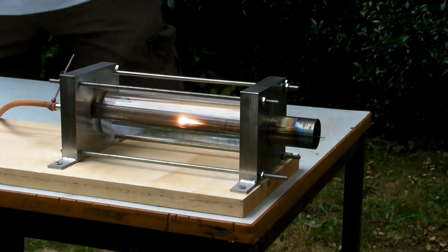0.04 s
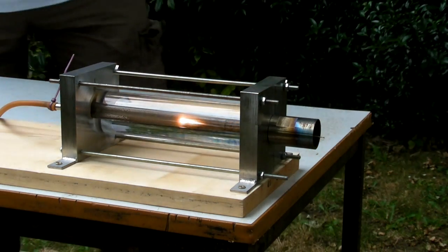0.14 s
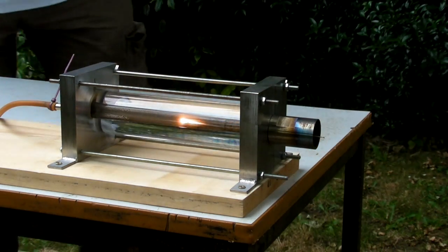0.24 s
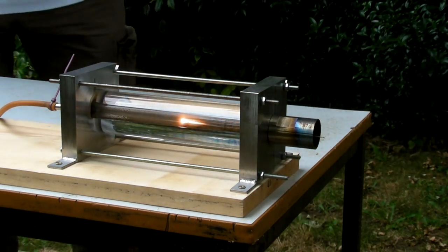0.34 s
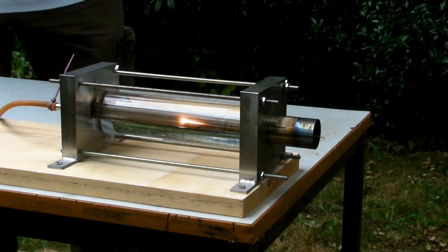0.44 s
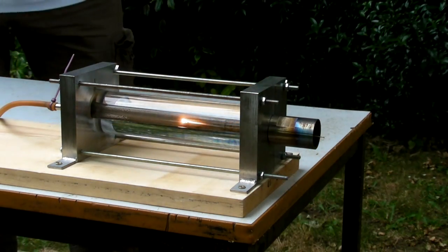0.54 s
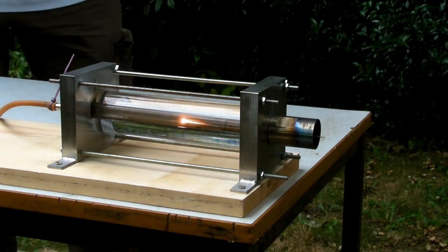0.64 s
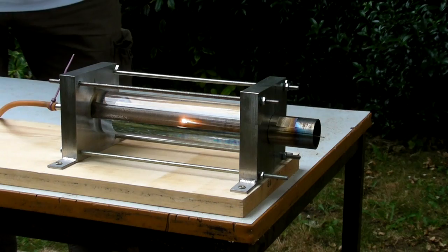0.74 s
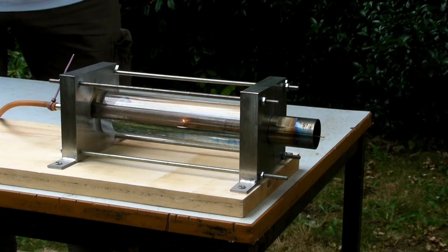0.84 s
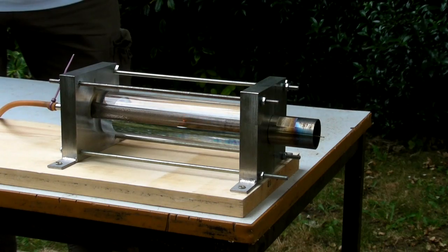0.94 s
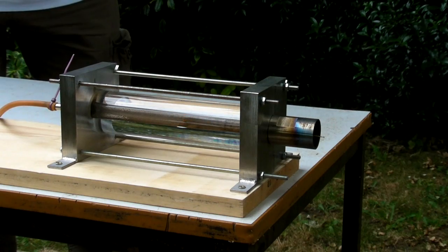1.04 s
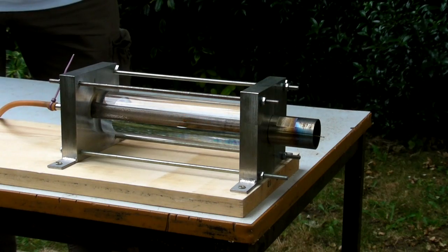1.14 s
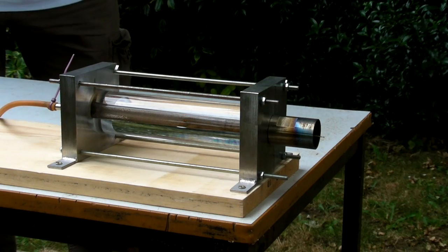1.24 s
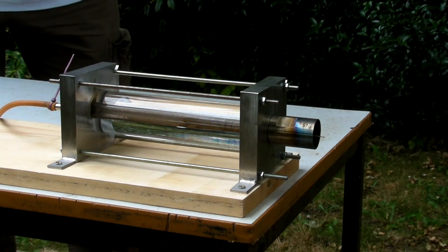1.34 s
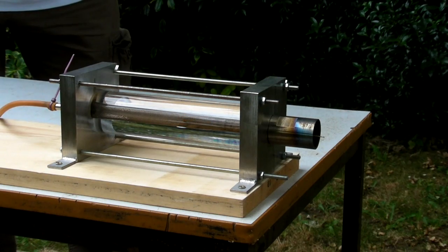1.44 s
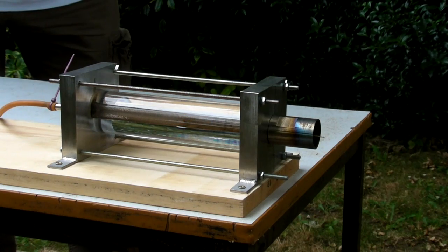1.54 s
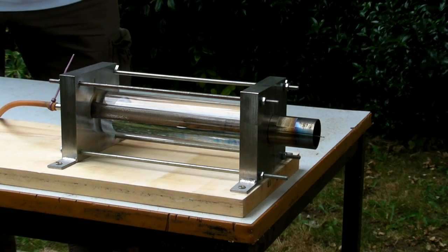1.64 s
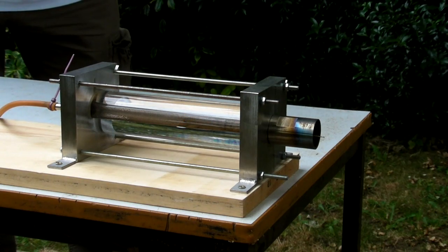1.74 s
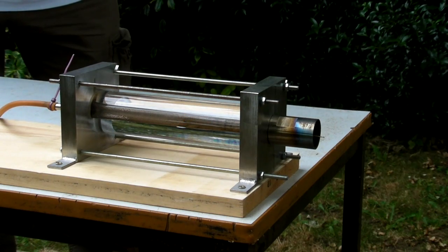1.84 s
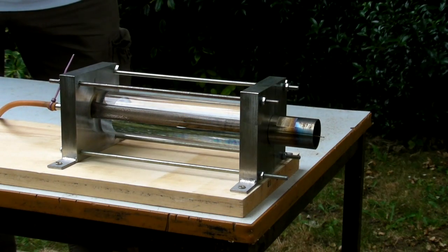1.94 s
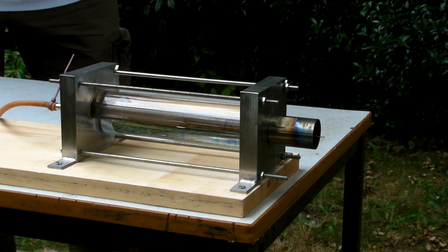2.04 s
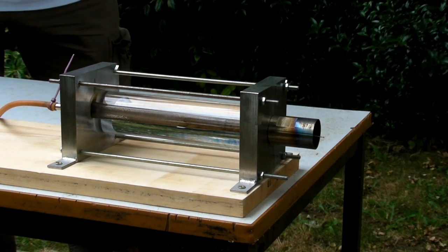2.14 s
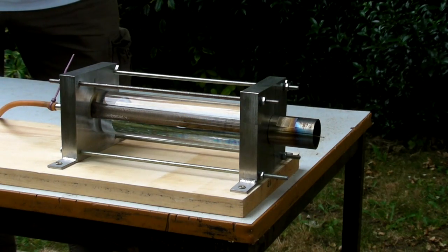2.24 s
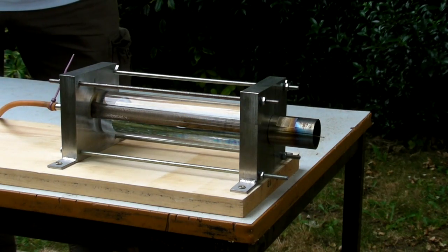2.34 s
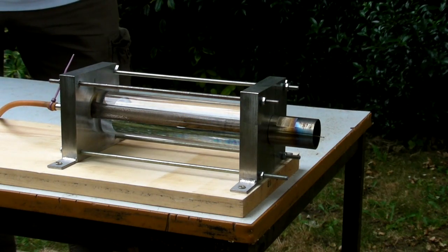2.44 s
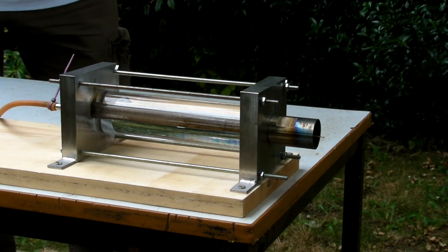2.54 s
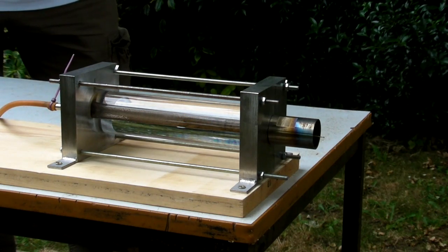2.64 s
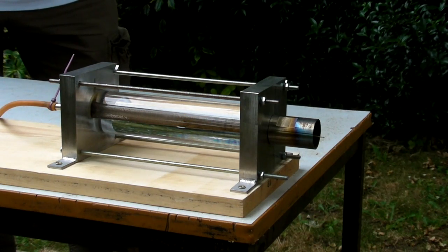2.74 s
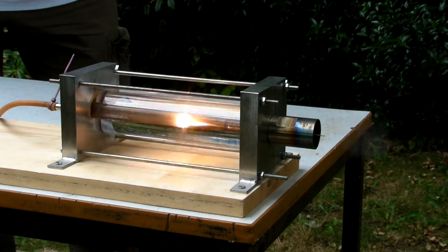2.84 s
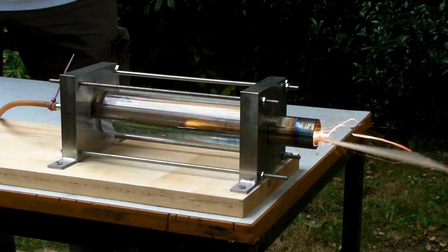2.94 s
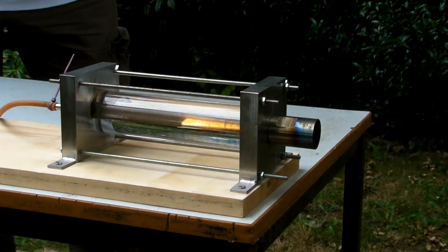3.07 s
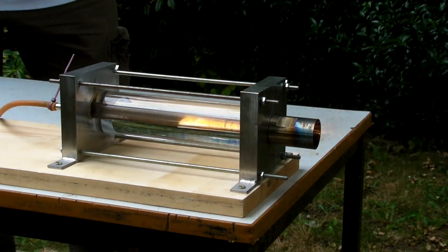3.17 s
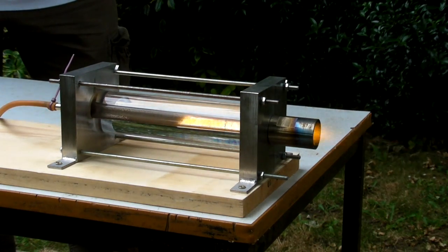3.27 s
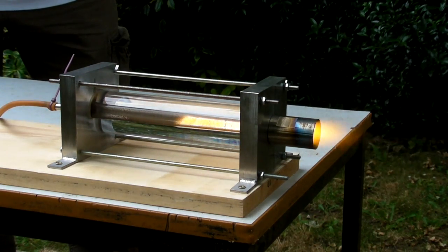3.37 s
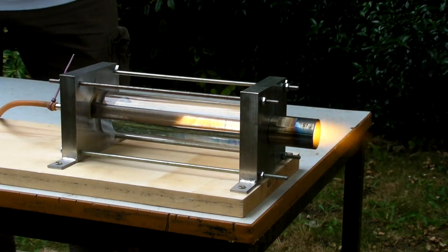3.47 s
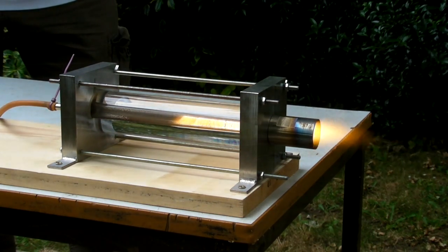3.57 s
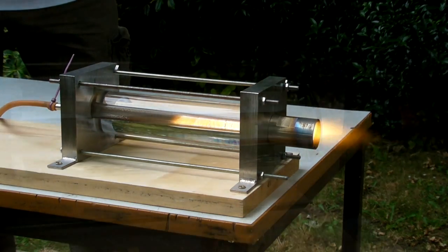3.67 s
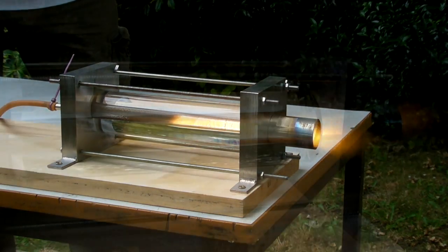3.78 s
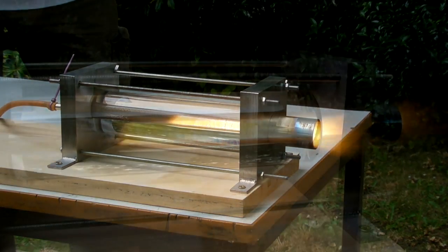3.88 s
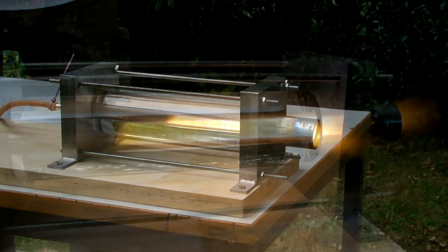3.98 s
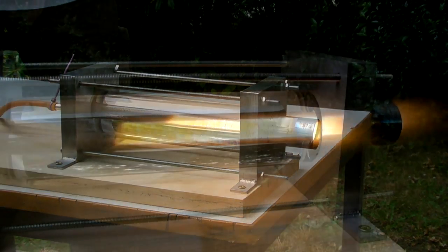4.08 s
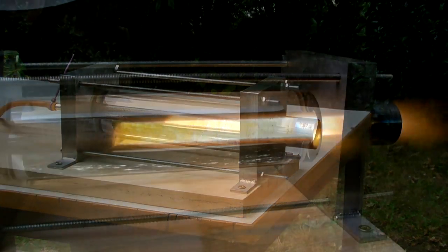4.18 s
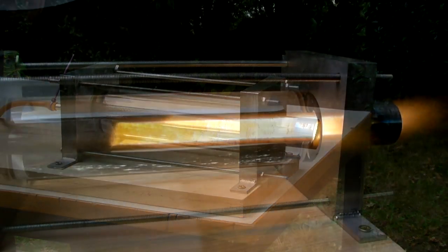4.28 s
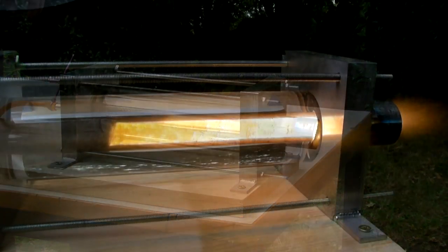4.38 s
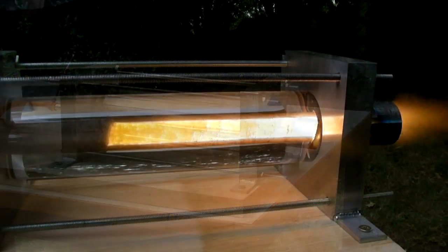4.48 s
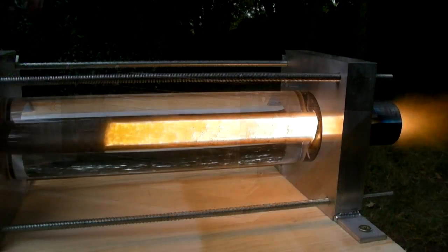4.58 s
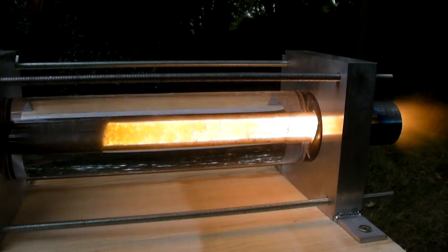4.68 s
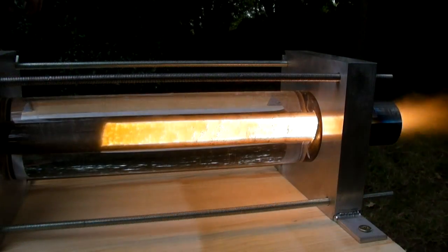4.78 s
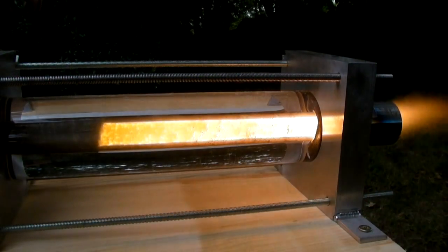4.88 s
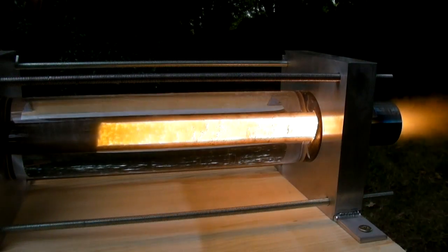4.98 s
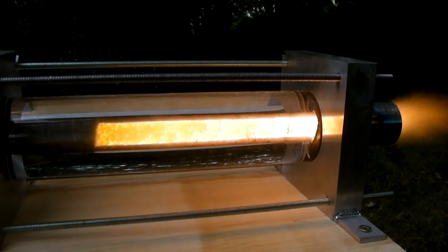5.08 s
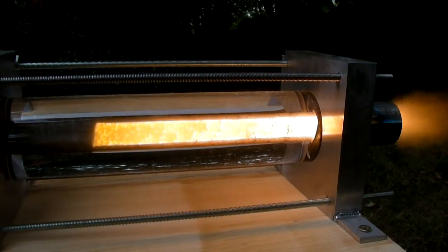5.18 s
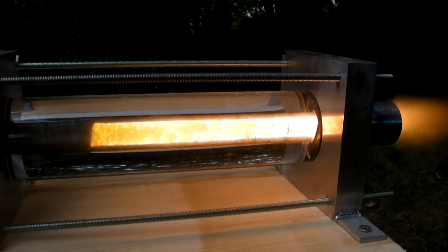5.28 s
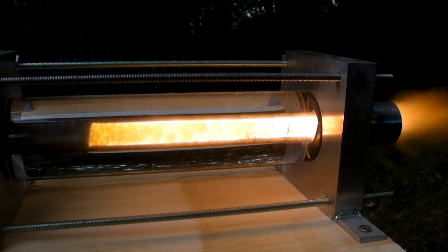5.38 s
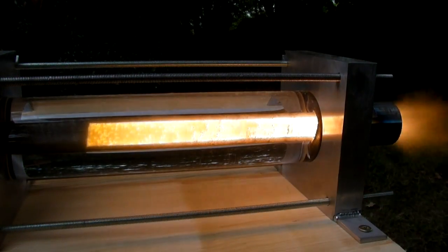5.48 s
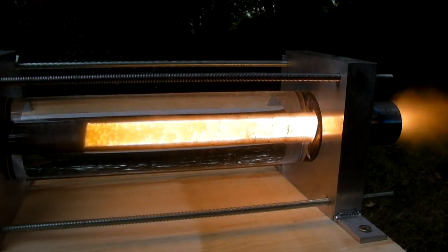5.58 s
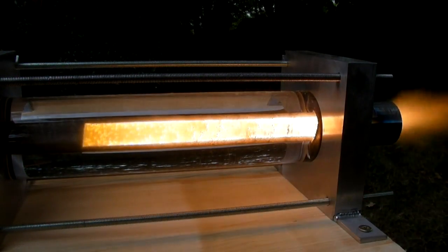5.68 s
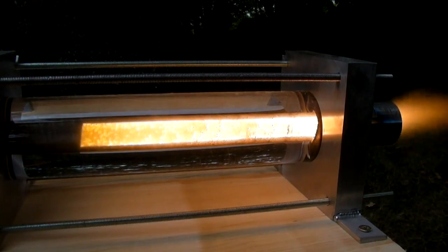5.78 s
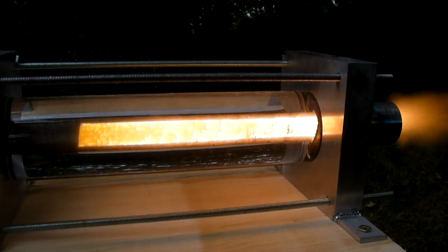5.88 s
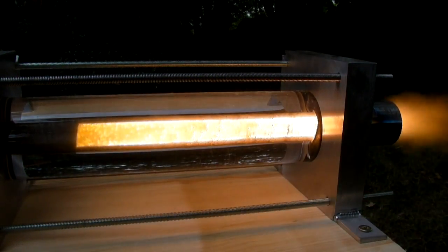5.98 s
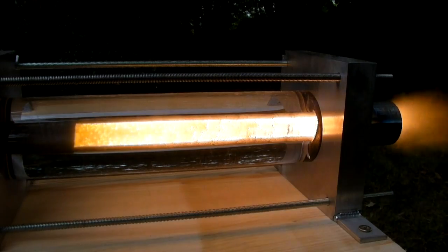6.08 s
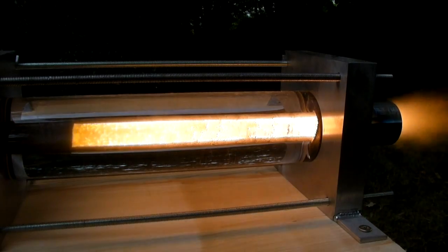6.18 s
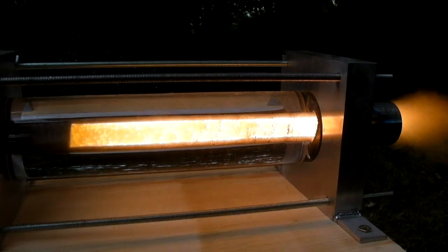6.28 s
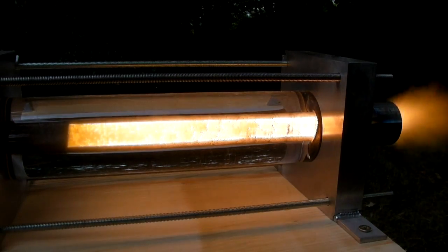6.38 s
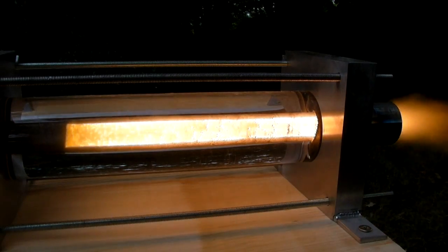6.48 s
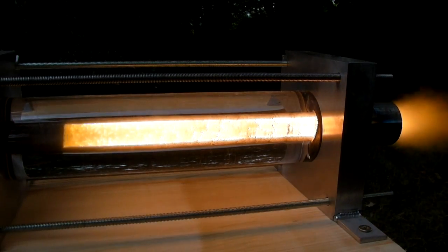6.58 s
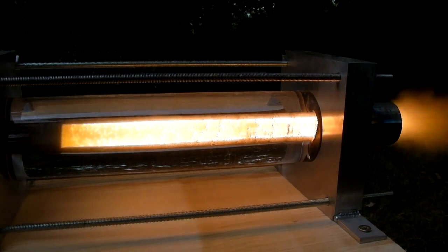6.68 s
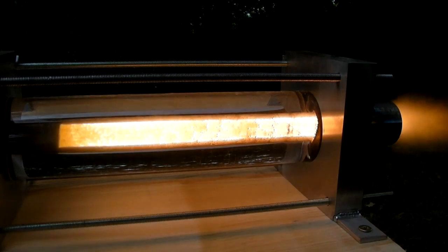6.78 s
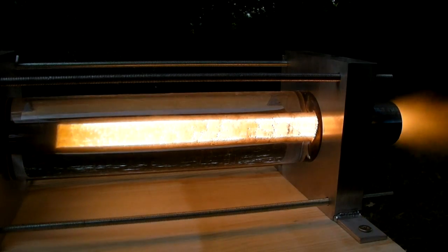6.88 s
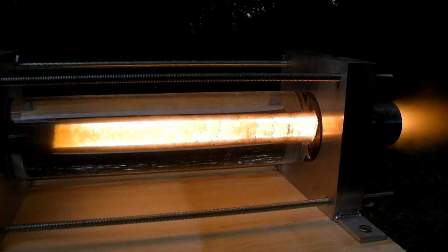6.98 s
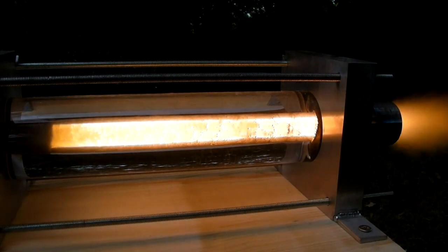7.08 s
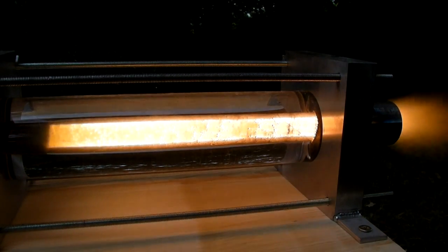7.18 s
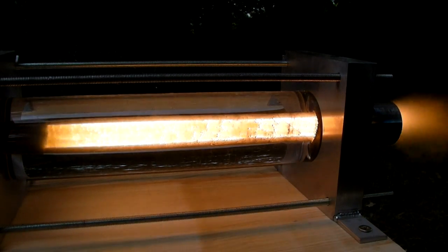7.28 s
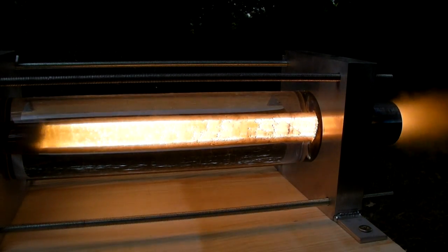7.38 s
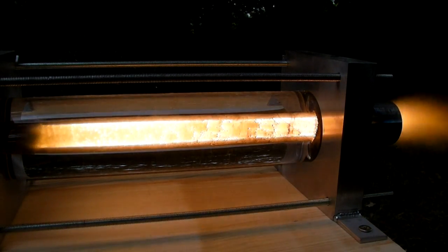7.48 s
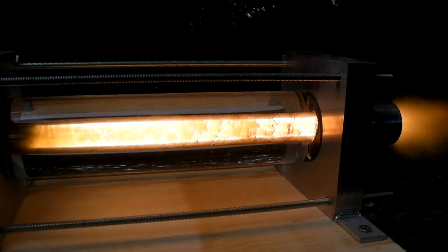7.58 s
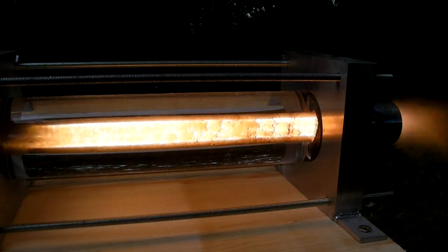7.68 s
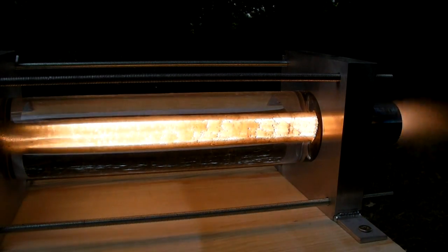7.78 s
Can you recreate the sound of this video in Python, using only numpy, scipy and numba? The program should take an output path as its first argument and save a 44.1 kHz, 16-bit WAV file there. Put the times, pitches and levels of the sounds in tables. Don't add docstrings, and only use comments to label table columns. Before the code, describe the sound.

A quiet garden with soft, low distant traffic. From 0 to 0.6 s, fingers and metal parts knock and click sharply, some hollow, with a gritty scrape near 0.4; sparse faint taps follow until 1.3. Thin bird chirps come at 1.7, 2.2, 2.5 and 2.7, a leaf swish at 1.9, a tiny stick-slip creak at 2.4. Valve clicks at 2.9 release a thin hiss; at 3.0 the gas lights, flares, nearly dies at 3.14, then surges to a full overloading roar by 3.4-3.5. A hollow howl around 700 Hz rises slightly and fades by 4.6. Meanwhile the distant perspective, with ground reflections, crossfades from 3.75 to 4.9 into a close, brighter, quieter jet. Steady rushing continues with puffs and a wavering whistle climbing from 2.3 to 3 kHz. Spits from 7.05 lock into a harsh 4 kHz screech at 7.3, jumping upward near 7.8 as a strong lower whistle closes.

```python
import sys
import numpy as np
from scipy import signal
from scipy.fft import rfft, irfft, next_fast_len
from scipy.io import wavfile
from scipy.ndimage import uniform_filter1d
from numba import njit

SR = 44100
rng = np.random.default_rng(int(sys.argv[2]) if len(sys.argv) > 2 else 0)


def transcribe(u):
    v = np.clip(np.atleast_2d(u).T, -1, 1)
    q = np.round(v * 32767).astype(np.int16)
    wavfile.write(sys.argv[1], SR, q)


def ratio(d):
    e = np.asarray(d, float) / 20
    return 10 ** e


N = 344862
T = np.arange(N) / SR
F = np.arange(N // 2 + 1) * SR / N + 1
FADE_S = 3.75, 4.88
CATCHES_S = 3.003, 3.022


def level(x, db):
    return x * ratio(db) / np.sqrt(np.mean(x ** 2))


def ramp(span):
    return np.clip((T - span[0]) / (span[1] - span[0]), 0, 1)


def stages(values, first, second):
    to_second = (values[1] - values[0]) * ramp(first)
    to_third = (values[2] - values[1]) * ramp(second)
    return values[0] + to_second + to_third


def on_log(table, hz, axis=1):
    rows = np.array(table)
    return np.interp(np.log(hz), np.log(rows[:, 0]), rows[:, axis])


def curves(table):
    s, *columns = np.transpose(table)
    inside = 1. * ((T >= s[0]) & (T <= s[-1]))
    return [np.interp(T, s, c) for c in columns] + [uniform_filter1d(inside, size=600)]


def walk(rate, size=N):
    k = int(SR / rate)
    held = np.repeat(rng.standard_normal(size // k + 1), k)
    return 1.18 * uniform_filter1d(uniform_filter1d(held, k), k)[:size]


@njit
def svf(x, hz, width):
    y, b, l = np.empty(len(x)), 0., 0.
    for i in range(len(x)):
        g, k = np.tan(np.pi * hz[i] / SR), width[i] / hz[i]
        v = (b + g * (x[i] - l)) / (1 + g * (g + k))
        b, l, y[i] = 2 * v - b, l + 2 * g * v, k * v
    return y


def ring(x, hz, share):
    return svf(svf(x, hz, share * hz), hz, share * hz)


def hiss(table, bands):
    db, gate = curves(table)
    noise = sum(svf(rng.standard_normal(N), hz + 0 * T, width + 0 * T) for hz, width in bands)
    return level(noise, 0) * ratio(db) * gate


def stereo_noise(colour, pair, size):
    hz = np.arange(size // 2 + 1) * SR / size + 1
    alike, lean_db, lead = (on_log(pair, hz, axis=k) for k in (1, 2, 3))
    mid, side = rfft(rng.standard_normal((2, size))) * np.sqrt([1 + alike, 1 - alike])
    tilt = ratio(lean_db / 2) * np.exp(.5j * lead)
    return hz, ratio(on_log(colour, hz)) * np.array([(mid + side) * tilt, (mid - side) / tilt])


def tone(table, rough, overtones_db, lead=0):
    beat_hz, overtone_slope = 230., .6
    hz, db, tremble_hz, gate = curves(table)
    out, on = np.zeros((2, N)), gate > 0
    size = on.sum()
    swing = 1 + rough * (walk(beat_hz, size) + 1j * walk(beat_hz, size))
    swing = swing / np.sqrt(1 + 2 * rough ** 2)
    pitch_hz = hz[on] + 0.75 * tremble_hz[on] * walk(800, size)
    phase = 2 * np.pi * np.cumsum(pitch_hz) / SR + np.angle(swing) + np.array([[lead], [0]])
    wave = np.sin(phase)
    for k, overtone_db in enumerate(overtones_db):
        weaker_db = overtone_slope * (db[on] - db.max())
        wave = wave + ratio(overtone_db + weaker_db) * np.sin((k + 2) * phase)
    out[:, on] = np.sqrt(2) * wave * np.abs(swing) * ratio(db[on]) * gate[on]
    return out


def traffic():
    # pitch_hz, level_db per Hz
    hum_colour = [(12, -37), (20, -16), (129, 3), (162, 0), (191, -8.5), (441, -6), (582, -9), (791, -9),
                  (884, -10.5), (1040, -10.5), (2280, -11.5), (2550, -12), (3760, -12.5), (5260, -20),
                  (15600, -27.5)]
    # pitch_hz, likeness 0-1, left_minus_right_db, left_leads_rad
    hum_pair = [(50, .65, 0, 0), (500, .5, 0, 0), (1500, .15, 0, 0), (3900, .05, 0, 0), (5000, .55, 0, 0),
                (8000, .15, 0, 0), (12000, 0, 0, 0)]
    hum = irfft(stereo_noise(hum_colour, hum_pair, size=N)[1], N)
    return level(hum * ratio(.5 * walk(6.6)), -48.5)


def ticks():
    # start_s, peak_db, centre_hz, treble_over_it_db
    taps = [(.004, -24, 3420, -28), (.027, -28, 6250, -23), (.07, -32, 4930, -16), (.084, -36, 4870, -11),
            (.153, -43, 3390, -4), (.177, -44, 3720, 2), (.195, -32, 4110, -2), (.28, -18.5, 2070, -33),
            (.352, -17, 5250, -30), (.365, -30, 5000, -20), (.122, -42, 4000, -20),
            (.427, -19.5, 1710, -10), (.451, -35, 1770, -18), (.458, -33, 3180, -21),
            (.471, -29, 4120, -17), (.479, -32, 1750, -18), (.491, -36, 4870, -21), (.534, -41, 4060, -24),
            (.593, -31.5, 3880, -28), (.791, -47, 3900, -17), (.865, -42, 2890, -19), (.94, -37, 3210, -10),
            (.983, -35, 1700, -30), (1.258, -42, 3620, -21), (2.872, -27.5, 3800, -7),
            (2.883, -29, 6000, -12), (2.893, -26.5, 1700, -16), (2.978, -34, 791, -9)]
    out, t = np.zeros((2, N)), np.arange(3000) / SR
    for s, db, hz, treble_db in taps:
        t60 = .03 - .0004 * (db + 35)
        shape = np.exp(-np.log(1000) * t / max(t60, .004)) * np.minimum(t / .002, 1)
        body = ring(rng.standard_normal(len(t)), hz + 0 * t, 1.37)
        edge = ring(rng.standard_normal(len(t)), 9600.0 + 0 * t, .8)
        knock = level(body, 0) + level(edge, treble_db)
        out[:, int(s * SR):int(s * SR) + len(t)] += ratio(db - 0.5) * shape * knock
    return out


def hollow_knocks():
    # start_s, pitch_hz, level_db, fade_by_60_db_s
    body_rings = [
        (.282, 614, -28, 0.04),
        (.282, 920, -30, 0.034),
        (.379, 1200, -34, 0.055),
        (2.896, 1230, -34, 0.026),
        (2.978, 855, -35, 0.057),
    ]
    out, t = np.zeros((2, N)), np.arange(3000) / SR
    for s, hz, db, t60 in body_rings:
        fall = np.exp(-np.log(1000) * t / t60)
        out[:, int(s * SR):int(s * SR) + len(t)] += ratio(db) * fall * np.sin(2 * np.pi * hz * t)
    return out


def scrape():
    # time_s, level_db, centre_hz
    drag = [(.32, -59, 5000), (.375, -42, 4000), (.38, -36, 1200), (.403, -30, 1600), (.415, -16.5, 1720),
            (.421, -28, 1800), (.431, -28, 1900), (.438, -48, 2500), (.5, -46, 4000)]
    db, hz, gate = curves(drag)
    grit = rng.standard_normal(N) * ratio(4.5 * walk(300))
    bright = ring(grit, 3800.0 + 0 * T, 1.6)
    return ratio(db) * gate * (level(ring(grit, hz, 0.97), 0) + level(bright, -9))


def birds():
    # start_s, length_s, pitch_hz, level_db
    calls = [
        (1.66, .1, 5400, -66),
        (2.2, .06, 5150, -58),
        (2.5, 0.092, 5650, -60),
        (2.71, 0.19, 5800, -58),
    ]
    trill = np.cumsum(60 * walk(300)) / SR
    out = 0
    for s, length, hz, db in calls:
        shape = np.sin(np.pi * np.clip((T - s) / length, 0, 1)) ** .5
        out = out + ratio(db + 4.3 * walk(46)) * shape * np.sin(2 * np.pi * (hz * T + trill))
    return out


def leaves():
    # time_s, level_db
    swish = [
        (1.83, -72),
        (1.87, -51),
        (1.9, -55),
        (1.97, -64),
    ]
    return hiss(swish, [(2750., 500.), (1900., 500.)])


def tap_creak():
    # start_s, level_db
    slips = [
        (2.403, -54),
        (2.422, -47),
        (2.444, -46),
        (2.468, -46),
        (2.495, -50),
    ]
    # pitch_hz, level_db
    handle = [(790, 1), (1110, 3), (2500, 1)]
    out, t = np.zeros((2, N)), np.arange(3000) / SR
    for s, db in slips:
        tones = sum(ratio(db + g) * np.sin(2 * np.pi * hz * t) for hz, g in handle)
        out[:, int(s * SR):int(s * SR) + len(t)] += np.exp(-t / .004) * tones
    return out


def flame_balance(flow_db):
    settles_s, rumbles_s = (3.31, 3.41), (3.44, 3.51)
    young_treble = -11. + .85 * flow_db
    settled_treble = -6.5 + 4.5 * ramp(FADE_S) ** 3
    treble_db = stages([-4., young_treble, settled_treble], CATCHES_S, settles_s)
    late_db = uniform_filter1d(np.interp(T - .012, T, flow_db), size=800)
    young_bass = -21. + (1 + 1.25) * late_db - flow_db
    rumble_db = -33.5 - 2. * ramp(FADE_S) - 1. * (T - rumbles_s[1])
    bass_db = stages([-12., young_bass, rumble_db - flow_db], CATCHES_S, rumbles_s)
    return treble_db, bass_db


def surges():
    # peak_s, gain_db, length_s
    bursts = [
        (4.92, 2.5, .06),
        (5.455, 5, .11),
        (5.68, 4.5, .2),
        (6.0, 4, .2),
        (7.0, 3, .08),
        (7.185, 3, .04),
        (7.25, 4, .04),
        (7.745, 3, .07),
    ]
    swell_db = 0
    for s, gain, length in bursts:
        times = [s - .018, s, s + length / 2, s + length]
        swell_db = swell_db + np.interp(T, times, [0, gain, gain / 1.5, 0])
    return swell_db


def jet(colour, pair, treble_db, bass_db, flicker_db, swell_db, from_hz, heard):
    hop = 16
    out, n = np.zeros((2, N)), heard.sum()
    size = next_fast_len(n, real=True)

    def slow(rate):
        return walk(rate * hop, -(-n // hop))

    def band(lo, hi):
        inside = np.abs(spectrum * ((hz > lo) & (hz < hi))) ** 2
        return np.sqrt(2 * np.mean(inside) * len(hz)) / size

    hz, spectrum = stereo_noise(colour, pair, size=size)
    surge = slow(35) - slow(35)
    treble_db, bass_db, swell_db = (x[heard][::hop] for x in (treble_db, bass_db, swell_db))
    mid, top, low = band(from_hz, 7500), band(8700, 15500), band(60, 600)
    total = 0
    for octave in np.arange(4, 14.5, .5):
        share = np.cos(np.clip(2 * (np.log2(hz) - octave), -1, 1) * np.pi / 2) ** 2
        if octave < 9.4:
            db, norm = bass_db, low
        elif octave > 12.9:
            db, norm = treble_db, top
        else:
            db = max(octave - 11.9, 0) * .6 * np.minimum(treble_db + 5, 0)
            db = db + max(11 - octave, 0) * .28 * np.minimum(bass_db + 25, 0)
            norm = mid
        shake = (octave / 13) ** 3 * (.8 * surge + 1.3 * slow(60))
        shake = shake + abs(1 - octave / 11) * 5 * slow(9)
        swell = swell_db * max(1 - abs(octave - 12.4) / 1.5, 0)
        gain = np.repeat(ratio(db + flicker_db * shake + swell), hop)[:n]
        total = total + irfft(spectrum * share / norm, size)[:, :n] * gain
    out[:, heard] = total
    return out


def rush(flow_db):
    # time_s, centre_hz
    climb = [
        (3.01, 2480),
        (3.04, 2690),
        (3.1, 3360),
        (3.15, 2900),
        (3.25, 3200),
        (3.33, 3760),
        (3.4, 4620),
        (3.48, 4330),
        (4.6, 4000),
    ]
    fades_s = 3.34, 3.47
    centre_hz = curves(climb)[0]
    rush_db = stages([-9., 1.2, -6.5], CATCHES_S, fades_s)
    width = .33 + .07 * np.maximum(flow_db + 11., 0) + .17 * ramp(fades_s)
    noise = ring(rng.standard_normal(N), centre_hz, width)
    chamber = svf(rng.standard_normal(N), 1800.0 + 0 * T, 200.0 + 0 * T)
    noise = level(noise, 0) + level(chamber, -13.5)
    wide = ratio(-20) * np.roll(noise, N // 2) * np.array([[1], [-1]])
    return (noise + wide) * ratio(rush_db + 1.7 * walk(40.01))


def echoes(x, axis):
    # delay_s, gain_far, gain_near
    bounces = [(.00284, 0.58, 0.1), (0.0032, -0.058, 0.0069), (.00345, 0.049, 0.42), (.00222, 0.08, 0.13),
               (0.0006, -0.051, -0.027)]
    bounce = sum(row[axis] * np.exp(-2j * np.pi * F * row[0]) for row in bounces)
    bounce = bounce / (1 + (700 / F) ** 2)
    return irfft(rfft(x) * (1 + bounce / (1 + F / 16000.0)), N)


def roar():
    # time_s, level_db
    puff = [
        (2.93, -64),
        (3.005, -41),
        (3.03, -18),
        (3.066, -8.5),
        (3.118, -6),
        (3.138, -21),
        (3.145, -13),
        (3.185, -16.5),
        (3.26, -10),
    ]
    # time_s, level_db
    burn = [
        (3.4, -9),
        (3.512, -8.5),
        (3.9, -10.5),
        (4.5, -18.7),
        (4.9, -21),
        (5.3, -23.5),
        (6.27, -23.5),
        (6.9, -21),
        (7.82, -22.5),
    ]
    # pitch_hz, level_db per Hz
    far_colour = [(20, -60), (40, -48.5), (600, -33.5), (800, -15), (1480, -17), (1800, -15.5),
                  (2560, -14.5), (3890, -10.5), (6500, -13), (7890, -14.5), (10500, -13.5), (13000, -17),
                  (15600, -21)]
    near_colour = [(20, -75), (45, -43), (105, -18), (320, -11.5), (420, -15), (570, -9), (1150, -7),
                   (1650, -12), (2200, -7.5), (2900, -2.5), (3770, -6), (6290, 0.5), (7750, -5.5),
                   (9800, -8.5), (12600, -4.5), (15600, -10)]
    # pitch_hz, likeness 0-1, left_minus_right_db, left_leads_rad
    far_pair = [(50, .92, -.5, 0), (300, .94, -.4, 0), (700, .996, 0, 0), (7800, .993, -.2, 0),
                (9000, .92, -.8, .1), (11500, .94, -2, .2), (14000, .88, -.6, .55), (15600, .85, -.3, .3)]
    near_pair = [(50, .94, -.6, 0), (1000, .975, -.2, 0), (2200, .985, 0, 0), (3500, .96, .4, 0),
                 (4200, .985, -.8, 0), (5000, .98, -3, 0), (8000, .97, -5, .1), (9700, .7, -4.5, .7),
                 (10500, .74, -2.6, .9), (13000, .82, -3.2, 1.35), (15500, .65, -1, 1.6)]
    flow_db, gate = curves(puff + burn)
    treble_db, bass_db = flame_balance(flow_db)
    swell_db = surges()
    fade = ramp(FADE_S) * np.pi / 2
    far_heard = (gate > 0) & (fade < np.pi / 2)
    far = ratio(-4.) * jet(far_colour, far_pair, treble_db + 4.5, bass_db + 1.5, 0.97, swell_db,
                         from_hz=1200, heard=far_heard)
    far = far + rush(flow_db)
    near = jet(near_colour, near_pair, treble_db, bass_db, 0.91, swell_db, from_hz=4980, heard=fade > 0)
    far_view = np.cos(fade) * echoes(far, axis=1) * ratio(-0.02)
    near_view = np.sin(fade) * echoes(near, axis=2)
    return ratio(flow_db) * gate * (far_view + near_view)


def valve_hiss():
    # time_s, level_db
    leak = [
        (2.945, -56),
        (2.96, -44),
        (3.0, -36),
        (3.018, -30),
        (3.025, -50),
    ]
    return hiss(leak, [(8350.0, 500.), (7500.0, 420.0)])


def howl():
    # time_s, pitch_hz, level_db
    chamber_note = [
        (3.36, 700, -36),
        (3.398, 699, -20),
        (3.468, 709, -13.5),
        (3.482, 733, -14),
        (3.52, 741, -12.5),
        (3.756, 756, -13.5),
        (4.078, 736, -18.5),
        (4.37, 726, -25),
        (4.62, 718, -35),
    ]
    trembling = [(*row, 17.) for row in chamber_note]
    return tone(trembling, .22, [-13, -10.5])


def whistles():
    # time_s, pitch_hz, level_db, pitch_tremble_hz
    first_whistle = [(4.3, 3190, -29, 70), (4.8, 3235, -27, 70), (5.05, 3270, -30, 90),
                     (5.45, 3270, -36, 110)]
    rising_whistle = [(4.75, 2344, -34, 90), (4.95, 2410, -26, 190), (5.43, 2555, -27.5, 190),
                      (5.455, 2585, -21.5, 35), (6.11, 2680, -20, 40), (6.55, 2740, -21, 100),
                      (7.05, 2860, -25, 260), (7.45, 2950, -37, 250), (7.75, 3094, -27, 200)]
    last_whistle = [(7.775, 3600, -32, 60), (7.79, 3500, -21, 60), (7.81, 3300, -24, 60),
                    (7.82, 3220, -12, 60)]
    out = tone(first_whistle, .9, []) + tone(rising_whistle, .7, [-24.], lead=-0.32)
    return out + tone(last_whistle, .3, [])


def screech():
    # peak_s, pitch_hz, level_db
    spits = [
        (7.065, 3875, -19),
        (7.177, 4010, -18.5),
        (7.21, 4034, -17),
        (7.258, 4020, -18),
    ]
    # time_s, pitch_hz, level_db, pitch_tremble_hz
    locked = [(7.28, 4020, -40, 60), (7.297, 4060, -18.5, 170), (7.52, 4150, -18.5, 90),
              (7.71, 4180, -17, 80), (7.75, 4040, -25, 109), (7.78, 4200, -21, 92), (7.79, 4450, -15, 90),
              (7.802, 4560, -38, 60)]
    steps = (-.015, -13.), (0, 0), (.017, -13.)
    sputter = [(s + dt, hz, g + drop, 170.) for s, hz, g in spits for dt, drop in steps]
    return tone(sorted(sputter + locked), .45, [-6])


def scene():
    garden = traffic() + birds() + leaves()
    hands = ticks() + hollow_knocks() + scrape() + tap_creak()
    motor = roar() + valve_hiss() + howl() + whistles() + screech()
    return garden + hands + motor


def band_limit(x):
    return signal.sosfilt(signal.butter(12, 15730, fs=SR, output="sos"), x)


def record(dry):
    notch = 1 - .92 / (1 + ((F - 7850) / 115.) ** 2)
    mix = np.clip(irfft(rfft(dry) * notch, N), -.99, .99)
    return band_limit(mix)


dry = scene()
out = record(dry)
transcribe(out)
```